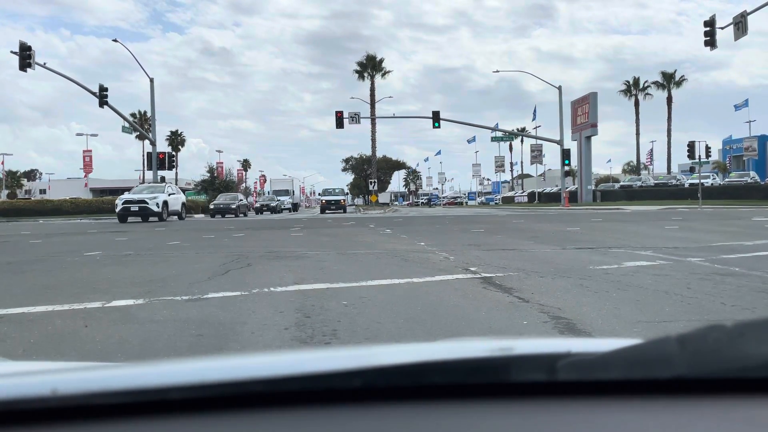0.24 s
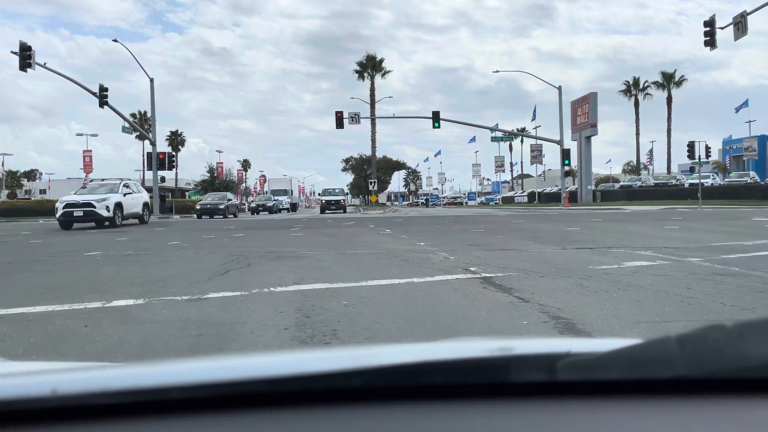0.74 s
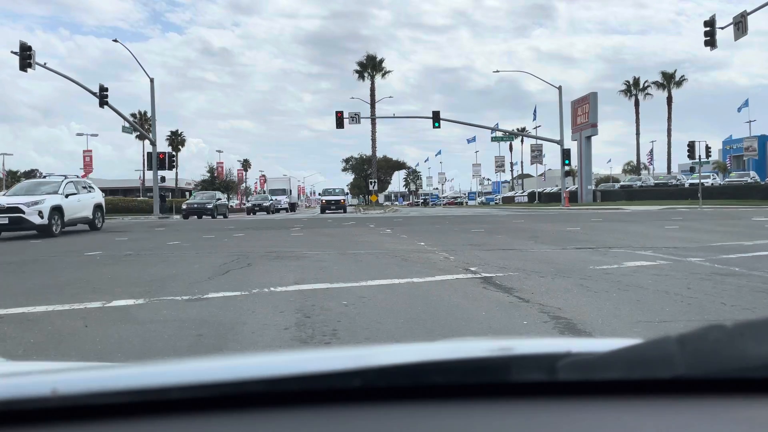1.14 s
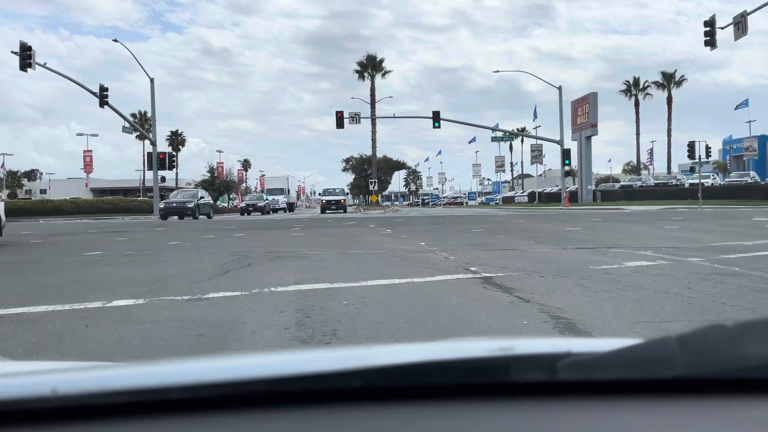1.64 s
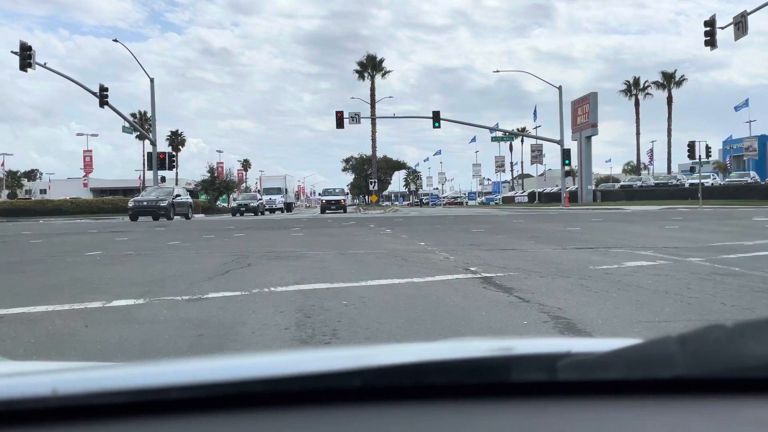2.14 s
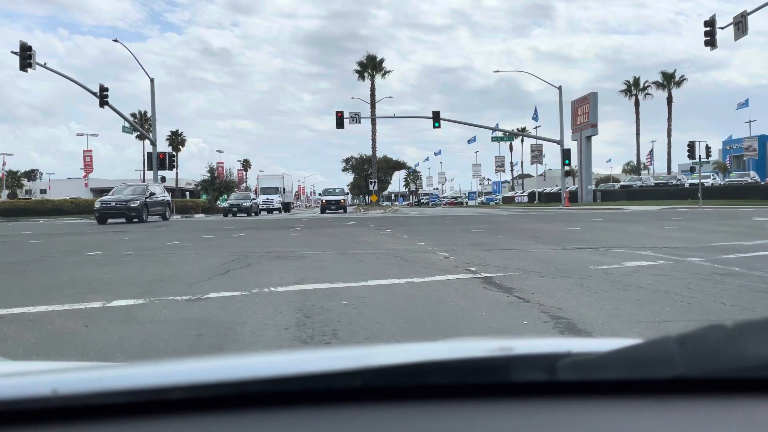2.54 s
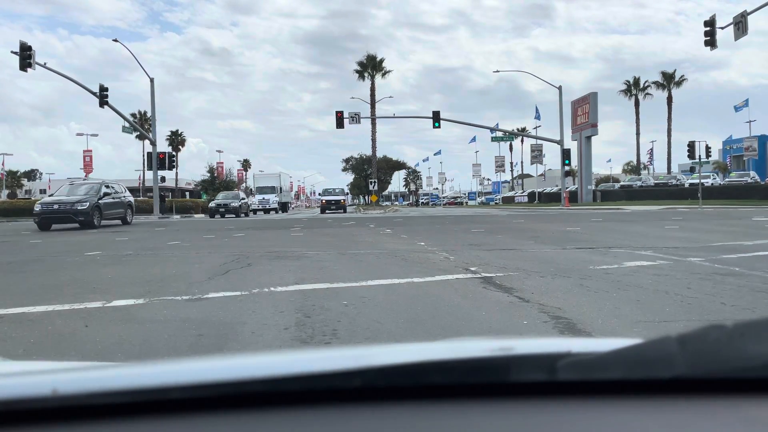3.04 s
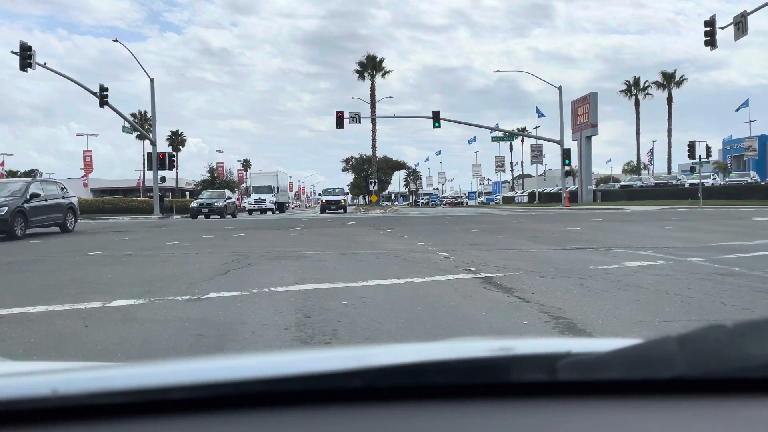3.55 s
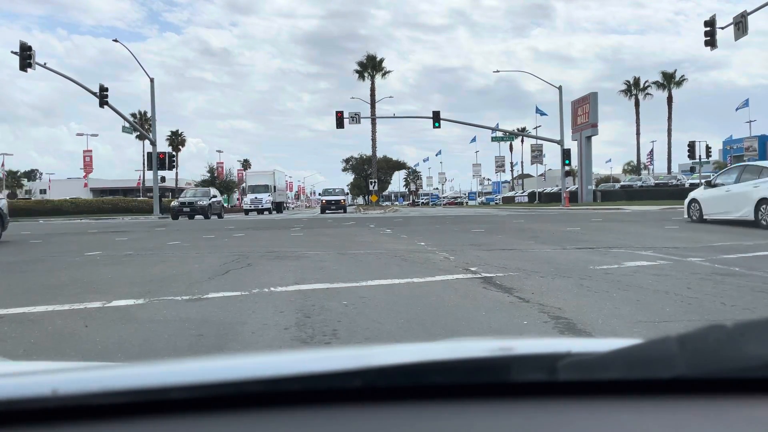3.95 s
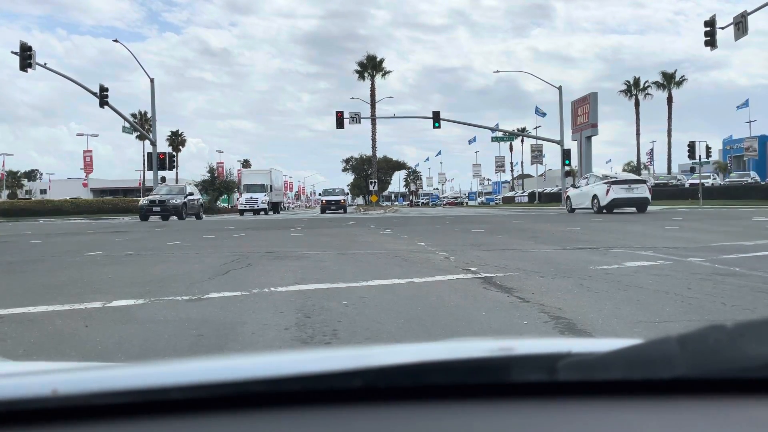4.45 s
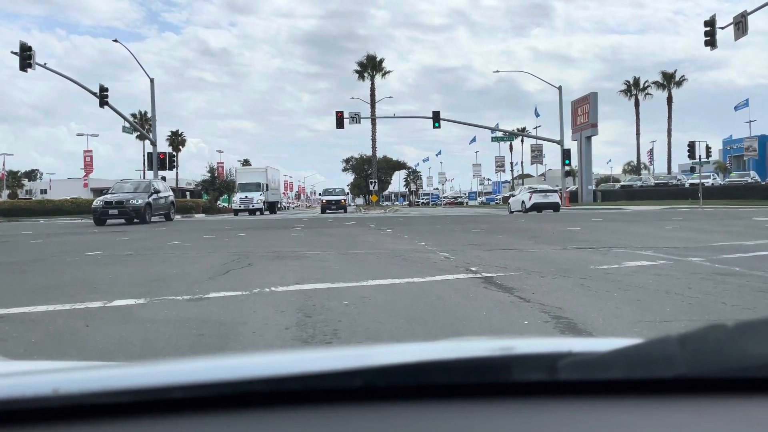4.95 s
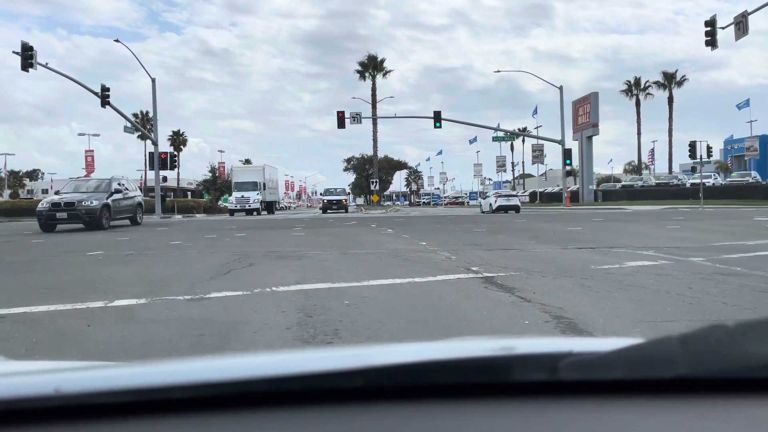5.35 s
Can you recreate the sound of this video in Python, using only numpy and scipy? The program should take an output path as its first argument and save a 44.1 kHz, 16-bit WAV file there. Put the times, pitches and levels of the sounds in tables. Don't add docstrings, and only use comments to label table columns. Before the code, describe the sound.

Close stereo cabin perspective, muffled and bass-heavy. A low idle pulses unevenly, some beats sinking weaker, over quiet panel rumble, thin air hiss and a faint fading pump whine. Cars crossing outside barely swell above it. After about four and a half seconds one quick rev bursts out, far louder, with rattling trim and rushing intake air; the pitch peaks and drops, ending abruptly while still above idle.

```python
import sys
import numpy as np
from scipy import signal
from scipy.fft import rfft, irfft
from scipy.io import wavfile
from scipy.ndimage import uniform_filter1d

SR = 44100
rng = np.random.default_rng(int(sys.argv[2]) if len(sys.argv) > 2 else 0)


def volts_from_decibels(level):
    exponent = np.asarray(level, float) / 20
    return 10 ** exponent


def generate_wav(signal):
    frames = np.transpose(np.atleast_2d(signal))
    scaled = np.clip(frames, -1, 1) * 32767
    pcm = np.round(scaled).astype(np.int16)
    wavfile.write(sys.argv[1], SR, pcm)


N = 246078
IDLE_HZ = 25.204


def evened(x):
    return x / np.sqrt(np.mean(abs(x) ** 2) + 1e-20)


def read(points, hz):
    f, value = np.transpose(points)
    return np.interp(np.log(hz + 1), np.log(f + 1), value)


def curves(*tables, size=600):
    s, *columns = np.transpose(np.concatenate(tables))
    t = np.arange(N) / SR
    return [uniform_filter1d(np.interp(t, s, c), size, mode="nearest") for c in columns]


def drift(hz):
    f = np.fft.fftfreq(4096, 64 / SR)
    chance = rng.standard_normal(4096) + 1j * rng.standard_normal(4096)
    slow = np.fft.ifft(chance * np.exp(-(f / hz) ** 2))
    return np.interp(np.arange(N) / 64, np.arange(4096), evened(slow))


def order(turns, rough, wander_hz):
    rough = np.clip(rough, 0, 1)
    gain = np.sqrt(1 - rough ** 2) + rough * drift(wander_hz)
    return np.sqrt(2) * (gain * np.exp(2j * np.pi * (turns + rng.random()))).real


def noise(spectra, opposed_db, patchy_db, size):
    # f/Hz, left over right/dB
    lean = [(60, .6), (300, .2), (950, 1.8), (2400, 2.4), (5000, 3.2), (7000, 0)]
    frames, hz = 4 * N // size + 5, np.fft.rfftfreq(size, 1 / SR)
    a, b, c, d, patches = rng.standard_normal((frames, len(hz), 5)).T
    patches = uniform_filter1d(uniform_filter1d(patches, size=9, axis=0), size=9, axis=1)
    patches = volts_from_decibels(patchy_db * evened(patches))
    shared, opposed = (evened(volts_from_decibels(read(s, hz)))[:, None] * patches * z
                       for s, z in zip(spectra, (a + 1j * b, c + 1j * d)))
    opposed = volts_from_decibels(opposed_db) * opposed
    z = np.array([shared + opposed, shared - opposed])
    z *= volts_from_decibels(np.outer([.5, -.5], read(lean, hz)))[..., None]
    out = signal.istft(z, nperseg=size, noverlap=3 * size // 4)[1][:, :N]
    return out / np.sqrt(np.mean(out.mean(0) ** 2))


def idling(hz):
    return np.clip((32 - hz) / 6, 0, 1)


def barks():
    # t/s, half length/s, lift/dB
    snaps = [
        (4.671, 0.036, 7.5),
        (5.35, 0.037, 6),
    ]
    t = np.arange(N) / SR
    return sum(db * np.exp(-((t - s) / half) ** 2) for s, half, db in snaps)


def stumbles():
    # t/s, depth/dB
    weak_burns = [(.74, -14), (1.02, -25), (1.3, 0.5), (1.5, -3), (1.83, -11), (2.29, -17), (2.38, 2),
                  (2.6, -18), (2.92, 1.5), (3.2, -4), (3.48, -11), (3.77, -9), (4.3, -9)]
    t = np.arange(N) / SR
    return sum(db * np.exp(-((t - s) / 0.033) ** 2) for s, db in weak_burns)


def firing_boom(hz, turns, firing_db, rock):
    # order, level/dB, unevenness 0-1, wander/Hz
    lumps = [(2, -16.5, 0.08, 5.9), (3, -19.5, 0.31, 5.1), (4, -23, 0.67, 10)]
    # f/Hz, level/dB
    cabin_boom = [(85, -25.5), (118, -21), (146, -35.5), (190, -23.5), (225, -24.5), (258, -24), (280, -32),
                  (300, -28.5)]
    idle = idling(hz)
    firing = volts_from_decibels(firing_db)
    lead = 0.16 * idle * np.sin(np.pi * turns / 2)
    weak_db, bark_db = stumbles(), barks()
    low = firing * order(turns + lead, 0.069 + 0.1 * idle, 24.0)
    for k, (_, rest_db, uneven, wander_hz) in enumerate(lumps, start=2):
        swept_db = read(cabin_boom, k * hz) + 6 * rock + bark_db
        rest_db = rest_db + weak_db * (k == 2)
        level = volts_from_decibels(idle * rest_db + (1 - idle) * swept_db)
        low += level * order(k * turns, 0.32 + (uneven - .15) * idle, wander_hz)
    opposed = volts_from_decibels(-37.5) * order(2.5 * turns, 1, 25.0)
    opposed += volts_from_decibels(-24.0) * firing * order(turns, .3, 4.0)
    return low * volts_from_decibels([[.3], [-.3]]) + opposed * [[1], [-1]]


def panels(hz, turns, rock):
    # f/Hz, level/dB
    cabin = [(80, -13), (105, -1), (125, -6.5), (170, -8), (250, -13), (305, -21), (340, -21.5), (600, -34)]
    # f/Hz, density/dB per Hz
    rumble = [
        [(6, -14), (16, -17.5), (30, -0.5), (60, 23), (100, 10.5), (200, 13), (300, 9.5), (340, -38.5)],
        [(20, -37), (60, 21), (150, 26), (300, 18), (345, -35)],
    ]
    idle = idling(hz)
    shake_db = -24.5 + 11 * rock + .3 * barks()
    loose_db = -4 + 4.5 * (1 - idle) - 5.5 * rock
    whole = sum(volts_from_decibels(read(cabin, k * hz)) * order(k * turns, 0.88 + 0.15 * (1 - idle), 0.7 * k)
                for k in range(5, 13))
    half = sum(volts_from_decibels(read(cabin, (k + .5) * hz)) * order((k + .5) * turns, 1.0, 3.6) for k in range(2, 7))
    upper = whole + volts_from_decibels(-10) * half
    upper /= np.sqrt(uniform_filter1d(upper ** 2, size=16000))
    upper *= volts_from_decibels(shake_db + 0.5 - 4.3 * (1 - idle))
    ring = order(297 * np.arange(N) / SR, 0.56, 8.2)
    upper += volts_from_decibels(shake_db - 13.5) * (1 - idle) * ring
    late = uniform_filter1d(upper, origin=7, size=15)
    return np.array([late, upper]) + volts_from_decibels(shake_db + loose_db) * noise(rumble, -6, 1.1, size=4096)


def engine(hz, turns, firing_db, rock):
    jitter_turns, jitter_hz = .05, 4
    turns = turns + jitter_turns * idling(hz) * drift(jitter_hz).real
    return firing_boom(hz, turns, firing_db, rock) + panels(hz, turns, rock)


def creaks():
    # t/s, length/s, level/dB, low f/Hz, high f/Hz
    scrapes = [(3.813, 0.038, -50.5, 3970, 9500), (3.816, .025, -63, 10000, 14700),
               (4.129, 0.029, -46.5, 2230, 2330), (4.129, 0.026, -46.5, 3360, 3670),
               (4.129, 0.013, -42.5, 1000, 3200), (4.133, 0.043, -23.5, 331, 510),
               (4.136, 0.037, -28.5, 510, 840), (4.427, .012, -53, 3366, 4260),
               (4.579, 0.21, -39, 330, 930), (4.645, 0.055, -23, 330, 794), (4.682, 0.057, -21, 448, 910),
               (4.648, 0.08, -43, 900, 3420), (4.663, 0.015, -60, 1999, 13000),
               (4.689, 0.029, -36.5, 1400, 3500), (4.704, .022, -41.5, 4500, 14700),
               (4.713, .016, -38, 1186, 3600), (4.756, 0.033, -41.5, 4500, 13100),
               (4.803, 0.013, -47, 4000, 10400), (4.816, 0.02, -36, 380, 1208),
               (5.441, 0.18, -29.5, 330, 538), (5.525, 0.1, -37, 480, 1450),
               (5.561, 0.01, -48, 8900, 14000)]
    out = np.zeros((2, N + SR))
    for s, length, level_db, low_hz, high_hz in scrapes:
        u = np.arange(6000)[None] / SR / length
        grain = volts_from_decibels(2.1 * evened(uniform_filter1d(rng.standard_normal(u.size), size=80)))
        sos = signal.butter(3, [low_hz, high_hz], "band", fs=SR, output="sos")
        band = signal.sosfilt(sos, rng.standard_normal((2, u.size)))
        shape = grain * np.minimum(u / 0.15, 1) * np.exp(-2.5 * u ** 4.2)
        mid, side = volts_from_decibels(level_db) * evened(band) * shape
        out[:, round(s * SR):][:, :u.size] += mid + side, mid - side
    return out[:, :N]


def intake_opening(hz):
    return 1 - np.exp(-np.maximum(hz - IDLE_HZ, 0) / 12)


def valve_hiss(hz, turns):
    # f/Hz, density/dB per Hz
    rush = [
        [(1290, -4), (2200, -8.5), (2510, -3), (3330, -1), (4700, -5.5), (5180, -5.5), (5660, -10.5), (7060, -13), (8240, -18.5), (8650, -31.5), (9470, -16.5), (10600, -19), (12800, -12.5), (14300, -14), (15400, -25)],
        [(1290, -21.5), (2200, 2.5), (2810, -4), (3310, 2), (3670, -4.5), (5210, -6.5), (5610, -12), (6090, -10.5), (7280, -9.5), (8770, -4.5), (11800, -14), (12500, -24.5), (13000, -35)],
    ]
    # f/Hz, waver/Hz, level over the hiss/dB
    duct_tones = [(385.6, 30, 6), (2650, 30, -25.5), (3256, 100, -11.5), (5330, 70, -17), (6900, 50, -26.5)]
    t = np.arange(N) / SR
    blip = np.maximum(hz - IDLE_HZ, 0) / (79 - IDLE_HZ)
    hiss_db = -54 + 7 * intake_opening(hz) + 3.5 * blip ** 2 + passing(column=3)
    fizz_db = -8.5 + 9.5 * blip
    puff = 1 + 0.068 * np.cos(2 * np.pi * turns)
    hiss = puff * noise(rush, .3, 1.5, size=512)
    fizz = signal.sosfiltfilt(signal.butter(4, 9500, "high", fs=SR, output="sos"), hiss)
    ducts = sum(volts_from_decibels(db) * np.array([order(f * t, 0.89, waver_hz) for microphone in "LR"])
                for f, waver_hz, db in duct_tones)
    rising = uniform_filter1d(1. * (np.gradient(hz) > 0), size=5000)
    slip = np.clip(hz / 64 - 1, 0, .1) * 10 * rising
    whistle = volts_from_decibels(-13.5) * slip * order(70 * turns, 0.85, 40.0)
    return volts_from_decibels(hiss_db) * (hiss + (volts_from_decibels(fizz_db) - 1) * fizz + ducts + whistle)


def pump_whine():
    t = np.arange(N) / SR
    whine_db = -55 - 1.12 * t - drift(1.5).real
    return volts_from_decibels(whine_db) * order(2064 * t, 0.97, 34.0) * volts_from_decibels([[1.2], [-1.2]])


def road_wash(hz):
    # f/Hz, density/dB per Hz
    wash = [
        [(180, -36), (310, 2.5), (329, -12), (377, 2), (448, -6), (480, -2), (762, -11), (896, -15), (1060, -11.5), (1150, -15), (1720, -21), (2110, -24), (2400, -26.5), (3120, -66), (5280, -120)],
        [(180, -11), (310, 2.5), (468, 2), (579, -0.5), (711, 3), (1090, -10.5), (1190, -4.5), (1940, -18), (2110, -28.5), (2170, -37.5), (2400, -43.5), (3120, -53.5), (5280, -120)],
    ]
    wash_db = -37.5 + 5.5 * intake_opening(hz) + 0.32 * passing(column=1)
    return volts_from_decibels(wash_db) * noise(wash, 1.6, 1.2, size=1024)


def air(hz, turns):
    flicker = volts_from_decibels(0.29 * drift(30).real)
    return flicker * (road_wash(hz) + valve_hiss(hz, turns)) + pump_whine()


def traffic():
    # f/Hz, waver/Hz, level/dB
    tyre_bands = [(884, 33, -4.5), (966, 81, -6.5), (1141, 14, -9.5)]
    t = np.arange(N) / SR
    near, far = (sum(volts_from_decibels(db) * order(f * t, 1.0, waver_hz) for f, waver_hz, db in tyre_bands)
                 for microphone in "LR")
    return volts_from_decibels(-47 + passing(column=1)) * np.array([1.69 * near, 1.2 * far - .5 * near])


def passing(column):
    # closest t/s, swell/dB, half length/s, spray of hiss/dB
    cars = [
        (1.447, 1.5, .5, 2.5),
        (2.47, 7.5, .35, .5),
        (3.599, 3, 0.6, 0.5),
        (4.82, 9, 0.26, 1.2),
    ]
    t = np.arange(N) / SR
    return sum(row[column] / (1 + ((t - row[0]) / row[2]) ** 2) for row in cars)


def scene():
    # t/s, firings per second/Hz, firing tone level/dB, rocking on the mounts 0-1
    blip = [(4.419, 24.76, -27, 0), (4.52, 26.8, -18, 0.12), (4.601, 30.4, -15, .4),
            (4.68, 40.98, -9.5, 0.95), (4.79, 57.17, -8.5, 0.86), (4.9, 70.88, -8.5, 0.8),
            (4.98, 73.5, -6.5, 0), (5.04, 74.95, -4.5, 0.22), (5.141, 76.9, -5, .2),
            (5.25, 72.08, -5.5, 0.37), (5.348, 64.7, -17, 0.6), (5.461, 57.53, -10, 0.43),
            (5.58, 52.1, -9, 0.65)]
    rest = (blip[0][0] - .03, IDLE_HZ, -28.5, 0)
    hz, firing_db, rock = curves([rest], blip)
    turns = np.cumsum(hz) / SR
    return engine(hz, turns, firing_db, rock) + creaks() + air(hz, turns) + traffic()


def band_limit(x):
    return signal.sosfilt(signal.butter(12, 15300, fs=SR, output="sos"), x)


def record(dry):
    # f/Hz, level/dB
    responses = [
        [(7400, 0), (8300, -8), (8500, -30), (9300, -30), (9700, -10), (10400, 0), (14300, 0), (15200, -14), (15400, -70)],
        [(11800, 0), (12420, -3), (12600, -70)],
    ]
    knee, ceiling = .7, .93
    room = ceiling - knee
    over = np.maximum(abs(dry) - knee, 0)
    left, right = np.sign(dry) * (np.minimum(abs(dry), knee) + room * np.tanh(over / room))
    pair = np.pad([left + right, left - right], ((0, 0), (0, 3000)), "linear_ramp", end_values=0)
    pair[:, -300:] += pair[:, :1] * np.linspace(0, 1, num=300)
    hz = np.fft.rfftfreq(pair.shape[1], 1 / SR)
    heard = irfft(rfft(pair) * volts_from_decibels([read(p, hz) for p in responses]), pair.shape[1])[:, :N]
    fade = np.minimum((N - np.arange(N)) / 80, 1)
    mid, side = heard / 2 * fade
    return band_limit(np.array([mid + side, mid - side]))


dry = scene()
out = record(dry)
generate_wav(out)
```